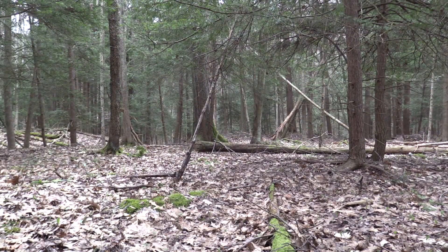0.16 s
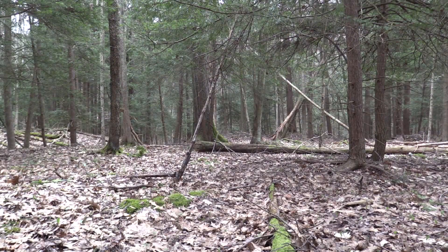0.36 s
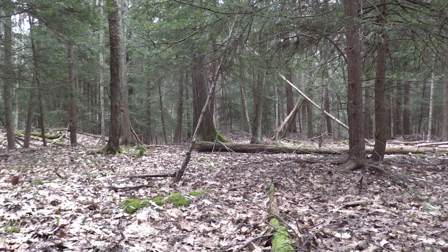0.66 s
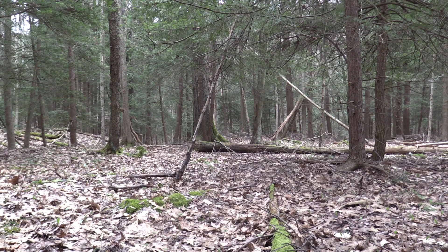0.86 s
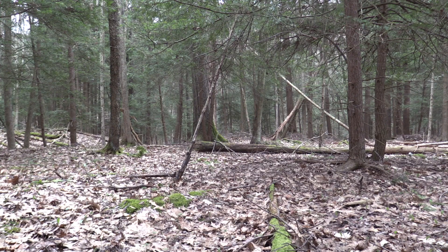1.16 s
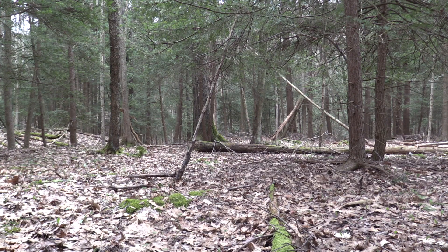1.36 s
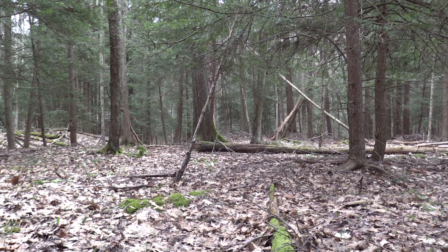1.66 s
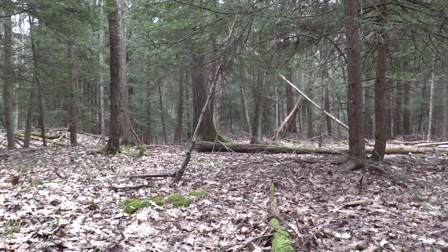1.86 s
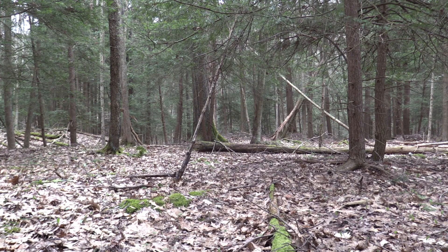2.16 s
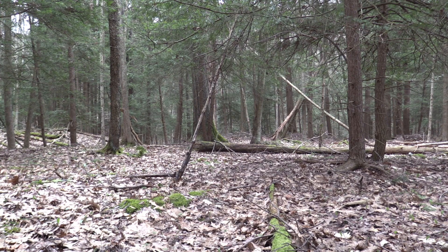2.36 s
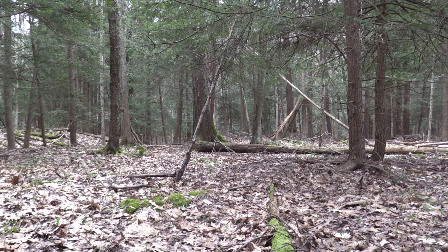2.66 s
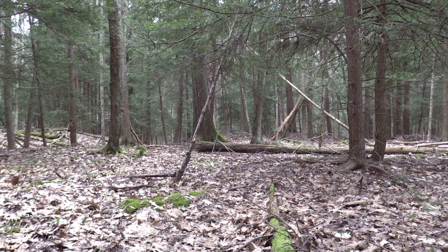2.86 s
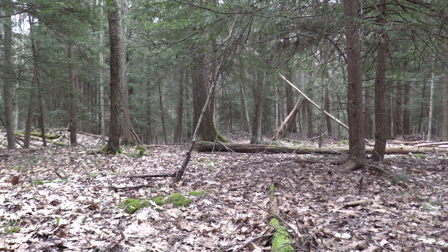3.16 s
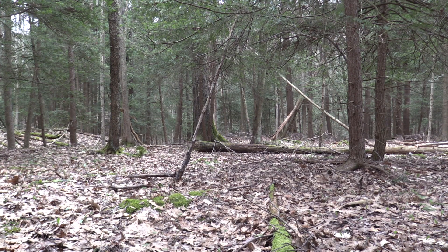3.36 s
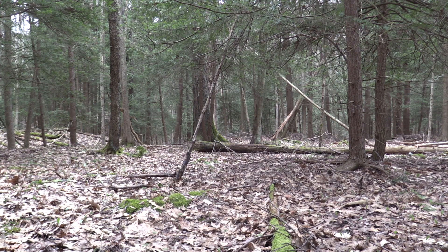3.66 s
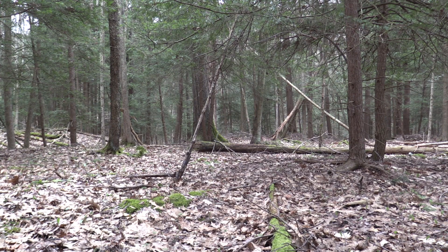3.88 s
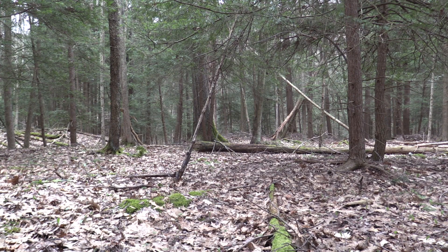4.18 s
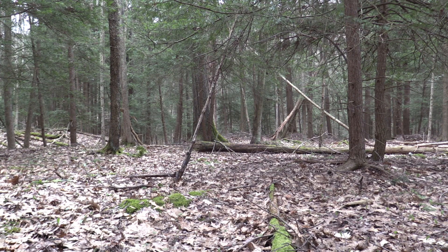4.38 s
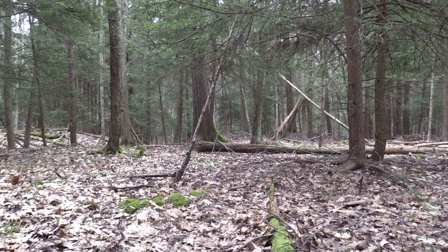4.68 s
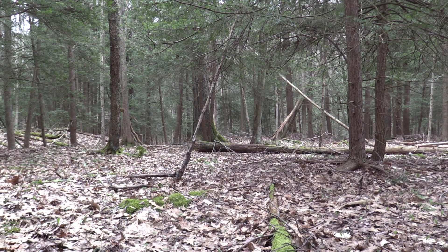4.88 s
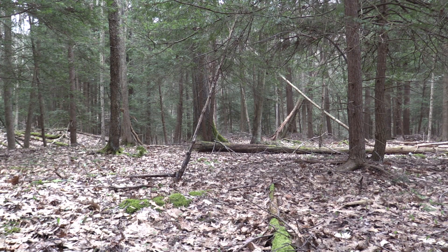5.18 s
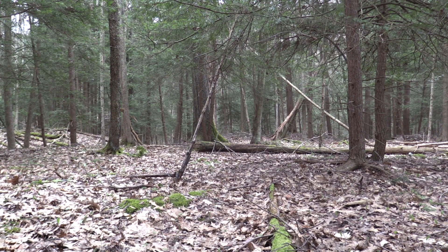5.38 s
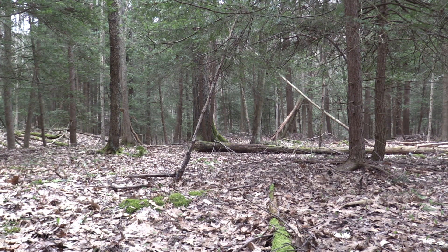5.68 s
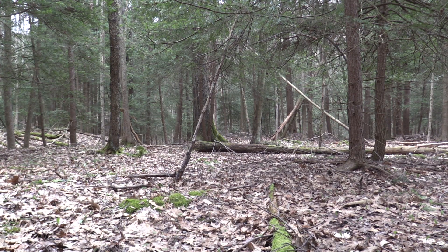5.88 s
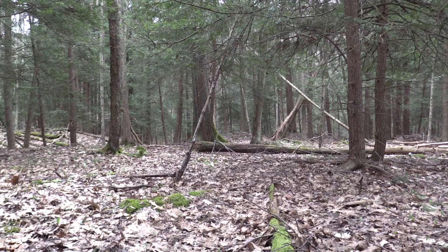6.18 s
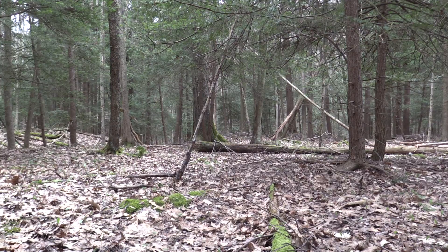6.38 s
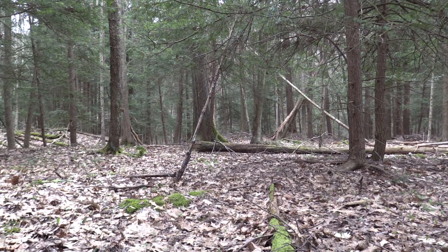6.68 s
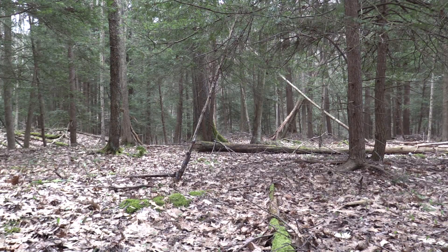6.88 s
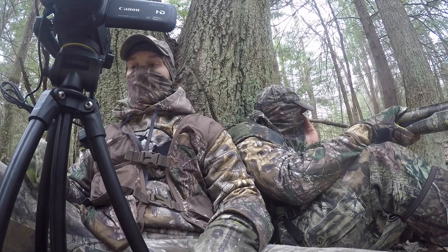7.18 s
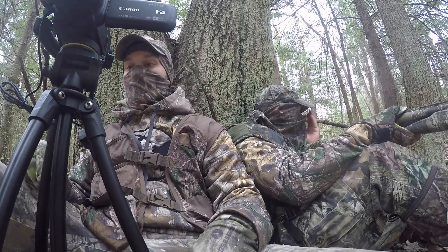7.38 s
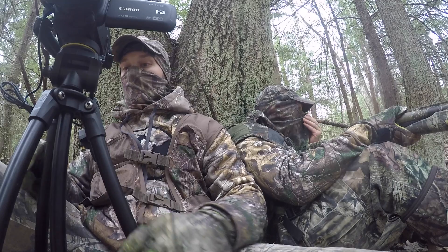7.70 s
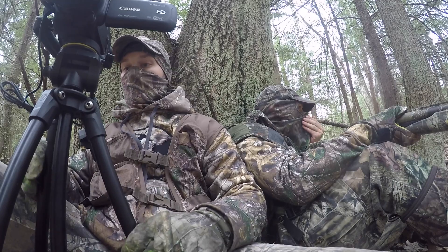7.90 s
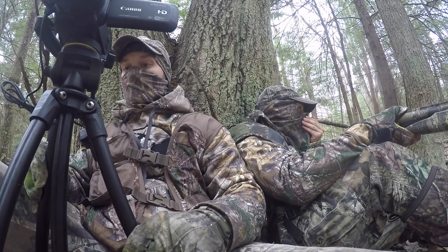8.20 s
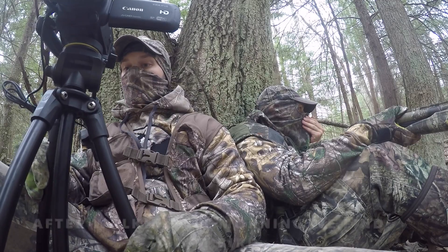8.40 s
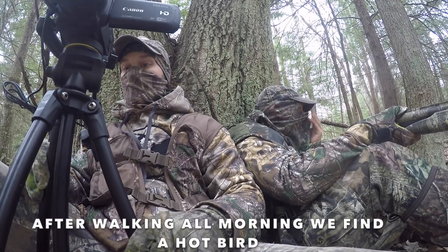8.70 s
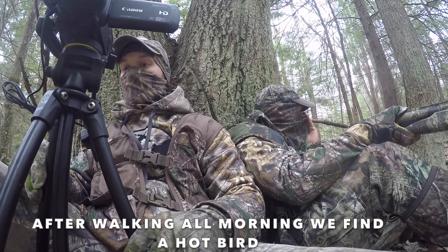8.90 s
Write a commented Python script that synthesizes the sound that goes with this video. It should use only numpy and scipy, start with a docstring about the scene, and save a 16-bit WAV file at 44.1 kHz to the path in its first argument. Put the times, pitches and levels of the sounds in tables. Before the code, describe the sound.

In quiet woodland, a reed call very near the microphone makes short, hard, hollow clucks, far louder than everything else, with quick woody reflections and a short tail. A far tom gobbles just after the opening cluck and again at the close. Between clucks there is airy hush, a tiny tick, a faint sleeve rustle, and wind rumble growing into deep buffeting.

```python
"""Sharp clucks from a reed call sound throughout, close to the microphone; a far turkey gobbles after the first
and the last. A cluck is a beating reed filtered by mouth resonances; trunks return it as echoes and a long
tail. A gobble is noise in moving throat resonances, with short gliding tones for its clear notes. Wind buffets
the microphone and cloth rustles. A thin tick sounds with the weak pair of clucks at 2.36 s, and another sounds
alone near 8.73 s. Beneath lie shaped noise for the forest hush and rumble, and two narrow bands for distant
hums."""
import sys
import numpy as np
from scipy import signal
from scipy.fft import rfft, irfft
from scipy.io import wavfile
from scipy.ndimage import uniform_filter1d

SR = 44100
rng = np.random.default_rng(int(sys.argv[2]) if len(sys.argv) > 2 else 0)


def file_out(sig):
    """Save sig as 16-bit WAV at sys.argv[1]."""
    # one column per channel
    cols = np.atleast_2d(sig).T
    # limit, then scale
    lim = np.clip(cols, -1, 1)
    pcm = np.round(lim * 32767).astype(np.int16)
    wavfile.write(sys.argv[1], SR, pcm)


N = 399105  # samples

# Reed clucks. Each row: start in seconds, level in dB, lead-in in ms, lip opening time in ms, first pitch
# in Hz, pitch at the break in Hz, break time in ms, pitch after it in Hz, drop after it in dB, hold in ms,
# middle resonance in Hz, then relative levels in dB of the low, middle, third and fourth resonance and the jet.
REED_CLUCKS = [(0.0226, -1, 2.3, 0.51, 660, 637, 7.6, 747, -7, 5.9, 1550, -19.5, -19, -24, -24.5, -51.5),
               (2.36, -26, .3, 1.1, 626, 556, 6.5, 518, -19, 1.5, 1500, -3, -1, -29, -28, -46),
               (2.3691, -27, .3, 1.6, 583, 543, 6.4, 482, -6, 1.2, 1100, -28, -2, -34, -25, -43),
               (2.8212, 0, 2.65, 1.4, 650, 629, 13.6, 644, -5.5, 2.3, 1010, -24.5, -17, -21, -26, -46),
               (4.2463, -2.5, 3.5, 1.7, 739, 587, 12.6, 601, -10, 2.4, 1125, -19, -16, -31, -24.5, -48),
               (4.986, -2, 2.84, 1.05, 659, 617, 8.26, 893, -3, 2.9, 1010, -28, -13.5, -16.5, -28, -47.5),
               (5.9734, -0.6, 2.1, 1.8, 685, 628, 7.42, 593, -10, 6.8, 1146, -23, -20, -33, -30, -53),
               (7.0991, -1, 3.7, 1.8, 694, 576, 13.5, 620, -12.5, 1.9, 1315, -17, -19.5, -27.5, -27, -47.5),
               (8.5247, -3, 2.6, 4, 703, 631.4, 14.3, 630, -14.5, 1.9, 1445, -17, -11, -32, -18, -50.5)]
# Mouth: low, middle, main, third and fourth resonance, then air jet. Each row: centre in Hz, width in Hz.
# Each cluck sets its own middle centre.
MOUTH_RESONANCES = [(660, 109), (1300, 263), (1880, 280), (3000, 326), (4950, 320), (9750, 1200)]
# Returns from the ground and nearest trunks. Each row: delay in ms, relative level in dB, sign.
TRUNK_ECHOES = [(15, -21, 1), (31.5, -18, 1), (45, -26, -1), (56, -22, -1), (79, -24, 1), (110, -29, 1),
                (127, -29, -1), (166, -27, 1), (177, -30, -1), (212, -34, 1), (236, -36, -1), (258, -37, 1),
                (358, -38, -1)]
# Forest decay before each tail stretches it. Each row: frequency in Hz, time to fall 60 dB in seconds.
FOREST_DECAY = [(400, 0.57), (700, 0.59), (1300, 1), (1900, 0.54), (3000, 1), (5000, 0.16), (11000, 0.21)]
# The gobbles. Each row: start in seconds, level offset in dB.
GOBBLE_STARTS = [(0.43, 1.94), (8.86, 1.5)]
# Course of the throat in a gobble. Each row: seconds after its start, three resonances in Hz, and their
# three levels in dB before the gobble's offset.
THROAT_COURSE = [(0, 645, 1200, 1800, -62, -49, -38.5), (0.065, 654, 1304, 1940, -52, -49, -44.5),
                 (0.11, 710, 1320, 1840, -47, -37, -38), (0.2, 670, 1270, 1870, -46.5, -48, -54),
                 (0.31, 677, 1110, 1850, -44.5, -42, -49), (0.63, 649, 1040, 1760, -47, -43, -50.5),
                 (1.23, 598, 964, 1820, -52.5, -49, -65), (1.82, 620, 1040, 1820, -57.5, -65, -61)]
# Notes that stand out of the gobbles. Each row: start in seconds, level in dB, leading resonance in Hz.
CLEAR_NOTES = [(0.435, -31, 1740), (0.459, -29, 1704), (0.507, -31, 1855), (0.52, -28.5, 1335),
               (0.562, -34.5, 1300), (0.675, -33, 1076), (0.719, -33, 1840), (0.744, -35, 1093),
               (0.79, -34, 700), (0.817, -39, 1010), (0.858, -26, 1088), (0.913, -39, 1796),
               (0.997, -35.5, 1040), (1.038, -29, 1059), (1.109, -29.5, 626), (1.194, -36, 1034),
               (1.225, -39, 1060), (1.305, -36, 646), (1.67, -35, 603), (8.87, -26, 1894),
               (8.872, -35.5, 966), (8.939, -44.5, 1910), (8.954, -32.5, 1634), (8.963, -28.5, 1318),
               (8.974, -31.5, 983), (8.999, -47, 1300)]
# Buffeting level, one list a gust. Each row: time in seconds, level in dB.
GUST_LEVELS = [
    [(4.95, -63), (5.154, -32.5), (5.222, -42), (5.368, -25.5), (5.416, -47), (5.452, -33), (6.25, -26),
     (6.602, -44), (6.7, -39.5)],
    [(7.72, -32), (7.812, -14.5), (7.938, -11.5), (8.046, -22.5), (8.22, -10), (8.604, -20.5),
     (8.668, -10.5), (8.734, -22.5), (9.05, -17)],
]
# Spectrum of the wind rumble. Each row: frequency in Hz, relative density in dB per Hz.
WIND_SPECTRUM = [(3.5, -26), (6.0, -16), (16, 13.5), (29, 1.5), (39, -10), (54, -12.5), (81, -23),
                 (124, -32.5), (199, -31), (300, -51.5), (390, -84), (660, -120)]
# Low thumps within the second gust. Each row: start in seconds, level in dB, frequency in Hz,
# time to fall 20 dB in ms.
GUST_THUMPS = [(8.18, -6.5, 108, 4.5), (8.489, -13.5, 110, 3.4)]
# A sleeve moves. The row: start in seconds, length in seconds, level in dB.
SLEEVE_RUSTLE = (6.2, 0.28, -60.5)
# Thin ticks: the first sounds with the weak pair of clucks, the second alone. Each row: start in seconds, #
# level in dB, centre in Hz.
THIN_TICKS = [(2.363, -37, 7900), (8.7284, -48, 9020)]
# Spectrum of the hush. Each row: frequency in Hz, relative density in dB per Hz.
HUSH_SPECTRUM = [(8.8, -1.5), (15, -1), (28, -15.5), (48, -16), (102, -8.5), (336, -25), (929, -15.5),
                 (1240, -21), (1360, -17.5), (1710, -20), (1870, -20.5), (2490, -19), (3540, -24),
                 (7310, -43.5), (15600, -47)]
# Distant hums. Each row: centre in Hz, width in Hz, level in dB.
DISTANT_HUMS = [(61.2, 16, -58.5), (96.7, 18.4, -63)]

LEAD_DB, FADE_MS = -14.5, 30  # main ring behind closed lips; time to fall 60 dB after the hold
ROUGH, MISSED = 0.22, 0.8  # reed roughness before the break, 0-1; share of the ring lost in the missed beat
SWELL_DB, SWELL_PER_DROP = 5, 0.35  # middle resonance swells at the break, less when the ring drops far
NOTE_S = 0.028  # length of a clear note
UNDER_DB = -19.5  # tones at all three throat resonances under the leading one
FLARE_DB = -9.5  # base level of the overtone flares against the lowest resonance
BUFFET_HZ, BUFFET_WAVER = 20, 0.1903  # mean eddy rate; rms share by which it wavers
HUSH_DB, HUM_WAVER_DB = -45.5, 5.0  # hush level; rms waver of the hums
EDGE_HZ = 15700  # upper band limit


def amp(db):
    """Decibels are twenty times the logarithm of an amplitude ratio; this inverts them."""
    return 10 ** (np.asarray(db) / 20)


def evened(x):
    """Root-mean-square normalisation: dividing by the effective value gives unit mean power."""
    return x / np.sqrt(np.mean(x ** 2) + 1e-20)


def read(points, hz):
    """Linear interpolation of a table along logarithmic frequency."""
    f, value = np.transpose(points)
    return np.interp(np.log(hz + 1), np.log(f + 1), value)


def add(mix, s, sound):
    """Superposition: a sound adds to the mix from a time in seconds."""
    part = mix[max(round(s * SR), 0):][:len(sound)]
    part += sound[:len(part)]


def coloured(points, size):
    """Spectral shaping: white noise multiplied by a frequency curve, at rms 1."""
    spectrum = rfft(rng.standard_normal(size))
    shaped = spectrum * amp(read(points, np.fft.rfftfreq(size, 1 / SR)))
    return evened(irfft(shaped, size))


def wander(size, span):
    """Low-pass noise: two moving averages of span samples leave a slow fluctuation of rms 1."""
    span = max(int(span), 2)
    return evened(uniform_filter1d(uniform_filter1d(rng.standard_normal(size), span), span))


def resonate(x, hz, width):
    """Heterodyne resonance: shift hz to zero, smooth, shift back; the centre may move, its gain is 1."""
    turn = np.exp(2j * np.pi * np.cumsum(hz * np.ones(len(x))) / SR)
    r = np.exp(-np.pi * width / SR)
    return 2 * (turn * signal.lfilter([1 - r], [1, -r], x / turn)).real


def band(x, hz, width):
    """Cascaded resonance: two equal passes steepen the skirts; the result has rms 1."""
    return evened(resonate(resonate(x, hz, width), hz, width))


def cluck(s, db, lead_ms, rise_ms, hz0, hz1, break_ms, hz2, drop_db, hold_ms,
          mid_hz, low_db, mid_db, third_db, fourth_db, jet_db):
    """Source and filter: a beating reed drives mouth resonances; lips open and the pitch breaks and sags."""
    ms = np.arange(2600) * 1000 / SR
    after = np.maximum(ms - break_ms, 0)

    before_hz = hz0 + (hz1 - hz0) * ms / break_ms
    sagging_hz = hz2 * (1 - 0.0053 * np.clip(after - hold_ms, 0, 25))
    hz = np.where(after > 0, sagging_hz, before_hz)
    hz = uniform_filter1d(uniform_filter1d(hz, size=50), size=50)
    broken = np.sin(np.pi / 2 * np.clip(after / 1.15, 0, 1)) ** 2
    rough = ROUGH * (1 + 1.75 * broken)  # the slack reed beats less evenly
    turns = np.cumsum(hz * (1 + 0.15 * rough * wander(len(ms), 43.8))) / SR

    opening = np.sin(np.pi / 2 * np.clip((ms - lead_ms) / rise_ms, 0, 1)) ** 2
    ring = opening - amp(LEAD_DB) * (1 - opening)  # closed lips pass the main ring weakly, inverted
    ring *= amp(-0.3 * np.maximum(break_ms - 1.5 - ms, 0))  # the push grows up to the break
    stumble = 1 - MISSED * np.exp(-((ms - break_ms - 0.4) / 0.77) ** 2)  # the reed misses a beat
    ring *= stumble * amp(broken * (drop_db + 3.2 * rough * wander(len(ms), 40)))
    closing = 1 - 0.018 * np.clip(after - hold_ms, 0, 15)  # the mouth closes and its main ring sinks

    low, middle, main, third, fourth, jet = MOUTH_RESONANCES
    swell_db = (SWELL_DB + SWELL_PER_DROP * drop_db) * broken
    mouth = [(*low, amp(low_db - 1.5 * after) * np.minimum(0.35 + ms / 10.0, 1)),
             (mid_hz, middle[1], amp(mid_db + swell_db)),
             (main[0] * closing, main[1], ring),
             (*third, amp(third_db) * opening),
             (*fourth, amp(fourth_db) * ring)]

    tone = np.zeros(len(ms))
    for k in np.arange(1, 30) / 2:  # half steps: strong and weak beats of a rough reed
        response = sum(gain / (1 + (2 * (k * hz - f) / width) ** 2) for f, width, gain in mouth)
        strength = rough if k % 1 else 1
        tone += response * strength * np.sin(2 * np.pi * (k * turns + rng.random()))

    air = rng.standard_normal(len(ms))  # air leaking past the reed
    for f, width, gain in mouth:
        tone += amp(-19.5) * rough * gain * band(air, f, 2 * width)
    hiss = band(air, *jet) + amp(3.0 - 0.8 * after) * band(air, 8100.0, 4500.0)
    # the jet swells towards the break and dies away after it
    jet_course_db = jet_db + 4.5 - 0.39 * np.maximum(break_ms - 2.5 - ms, 0) - 1.1 * after
    tone += amp(jet_course_db) * opening * hiss

    fade_db = 60 * (np.maximum(after - hold_ms, 0) / FADE_MS)
    attack = np.sin(np.pi / 2 * np.minimum(ms / 0.33, 1)) ** 2
    return amp(db - fade_db) * attack * tone


def tail(start_ms, stretch):
    """Diffuse scattering: sparse taps of random sign, each band decaying at its own rate; energy 1."""
    taps, at = np.zeros(SR), np.arange(0, SR - 20, 20)
    taps[at + rng.integers(0, 20, len(at))] = rng.choice([-1., 1.], len(at))
    hz, t, z = signal.stft(taps, SR, nperseg=256)
    decay = amp(-60 * t / stretch / read(FOREST_DECAY, hz)[:, None])
    taps = signal.istft(z * decay, SR, nperseg=256)[1]
    taps *= np.clip(np.arange(len(taps)) * 1000 / SR / start_ms, 0, 1)  # fades in over start_ms
    return taps / np.linalg.norm(taps)


def calls():
    """Reflection and scattering: the direct clucks are convolved with smeared echoes and a lumpy tail."""
    direct, paths = np.zeros(N), np.zeros(SR)
    for row in REED_CLUCKS:
        add(direct, row[0], cluck(*row))
    for ms, db, sign in TRUNK_ECHOES:
        smear = rng.standard_normal(90) * amp(-np.arange(90) / 0.72 - 5.5)  # bark and leaves
        smear[0] = sign
        add(paths, ms / 1000, amp(db - 5.0) * smear)
    # near trunks throw short waves back best, far paths lose them in the leaves
    near = np.exp(-np.arange(SR) / SR / 0.055)
    bright_paths = paths + 5.7 * np.diff(paths, prepend=0)
    paths = near * bright_paths + (1 - near) * uniform_filter1d(paths, size=4)
    scatter = tail(2.9, 0.87)[:SR]
    paths += amp(-20.5) * scatter * amp(6.6 * wander(SR, 260))
    # the far slopes answer longer and duller
    paths += amp(-25.0) * uniform_filter1d(tail(55.0, 3.3)[:SR], size=7)
    return direct + signal.fftconvolve(direct, paths)[:N]


def note(hz):
    """Frequency modulation: the phase integrates a falling, wavering pitch under a short envelope."""
    u = np.arange(int(NOTE_S * SR)) / SR
    glide = hz * (1.03 - 1.1 * u + 0.02 * wander(len(u), 170))
    shape = np.minimum(u / 0.0035, 1) * np.cos(np.pi / 2 * u / u[-1])
    shape = shape * amp(0.59 * wander(len(u), 160))
    return shape * np.sin(2 * np.pi * (np.cumsum(glide) / SR + rng.random()))


def gobbles():
    """Formant filtering: noise in moving throat resonances blurs with distance; some notes stay clear."""
    t, blurred, clear = np.arange(N) / SR, np.zeros(N), np.zeros(N)
    s, *columns = np.transpose(THROAT_COURSE)
    latest = np.searchsorted([g[0] for g in GOBBLE_STARTS], t) - 1
    start, loud_db = np.array(GOBBLE_STARTS)[np.maximum(latest, 0)].T
    sounding = ((t > start) & (t < start + s[-1])) * 1.
    on = amp(loud_db) * uniform_filter1d(sounding, size=200)
    course = [np.interp(t - start, s, column) for column in columns]
    throat_hz, throat_db = course[:3], course[3:]

    for hz, db, width in zip(throat_hz, throat_db, [150., 210., 260.]):
        hz = hz * (1 + 0.04 * wander(N, 990))
        voice = band(rng.standard_normal(N), hz, width)
        blurred += on * amp(db + 0.55 * wander(N, 770)) * voice

    flare = signal.windows.hann(int(1.47 * NOTE_S * SR))
    for at, db, lead_hz in CLEAR_NOTES:
        i = round(at * SR)
        under = sum(note(hz[i]) for hz in throat_hz)
        add(clear, at, amp(db) * (note(lead_hz) + amp(UNDER_DB) * under))
        for hz, top_db in [(3400, 3.0), (5450, -38.0)]:  # overtones flare with the notes
            overtone = evened(resonate(rng.standard_normal(len(flare)), hz, 140.0))
            add(clear, at, amp(throat_db[0][i] + FLARE_DB + top_db) * flare * overtone)

    effort = on * amp(throat_db[0])  # these fixed-pitch bands follow the level of the lowest resonance
    for hz, width, db in [(890, 85.0, -30), (1470, 97.0, -16), (2340, 65.0, -13.5), (3220, 100.0, -17)]:
        blurred += effort * amp(db) * evened(resonate(rng.standard_normal(N), hz, width))
    return blurred + clear + amp(-5.5) * signal.fftconvolve(clear, tail(29.0, 2.1))[:N]


def wind():
    """Vortex shedding at the microphone port: a wavering slow push, its lumpy rumble and two thumps."""
    out = np.zeros(N)
    for rows in GUST_LEVELS:
        s, db = np.transpose(rows)
        t = np.arange(s[0], s[-1], 1 / SR)
        hz = BUFFET_HZ * (1 + BUFFET_WAVER * wander(len(t), 4330))
        push = np.sqrt(2) * np.sin(2 * np.pi * (np.cumsum(hz) / SR + rng.random()))
        gust = push + amp(-8.0) * coloured(WIND_SPECTRUM, len(t))
        add(out, s[0], amp(np.interp(t, s, db)) * gust * np.minimum((t - s[0]) / 0.0143, 1))
    for s, db, hz, ms in GUST_THUMPS:
        u = np.arange(2000) / SR
        envelope = amp(db - 20 * u * 1000 / ms) * np.minimum(u / 0.0027, 1)
        add(out, s, envelope * np.sin(2 * np.pi * hz * u))
    return out


def small_sounds():
    """Friction and impulse: cloth is enveloped shaped noise, each tick a short decaying noise band."""
    (s, length, db), out = SLEEVE_RUSTLE, np.zeros(N)
    size = int(length * SR)
    cloth = coloured([(1500, -19), (4000, -1), (8000, -4), (13000, -15)], size)  # (Hz, relative dB)
    add(out, s, amp(db + 3.0 * wander(size, 700)) * cloth * signal.windows.hann(size))
    for s, db, hz in THIN_TICKS:
        i = np.arange(200)
        envelope = amp(db - i / 10.0) * np.minimum(i / 45.0, 1)
        add(out, s, envelope * band(rng.standard_normal(200), hz, 4500.))
    return out


def hush():
    """Broadband noise: air in the trees, far rumble and microphone hiss share one gently swelling spectrum."""
    return amp(HUSH_DB + 0.16 * wander(N, 4100)) * coloured(HUSH_SPECTRUM, N)


def drone():
    """Narrow-band noise: each resonance makes a fuzzy low hum whose level wavers slowly."""
    out = np.zeros(N)
    for hz, width, db in DISTANT_HUMS:
        hum = evened(resonate(rng.standard_normal(N), hz, width))
        out += amp(db + HUM_WAVER_DB * wander(N, 6000)) * hum
    return out


def scene():
    """Superposition: pressures of all the sources add at the microphone."""
    return (calls() + gobbles() + wind() + small_sounds() + hush() + drone())[None]


def record(dry):
    """Saturation and band limiting: the input stage rounds off loud peaks, then a low-pass cuts the top."""
    ceiling = 1.25
    held = ceiling * np.tanh(dry / ceiling)
    low_pass = signal.firwin(1023, EDGE_HZ, window=("kaiser", 9), fs=SR)
    return signal.oaconvolve(held, low_pass[None], "same")


dry = scene()
out = record(dry)
file_out(out)
```